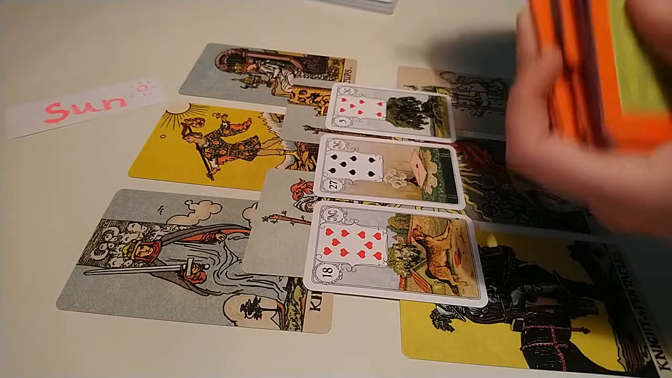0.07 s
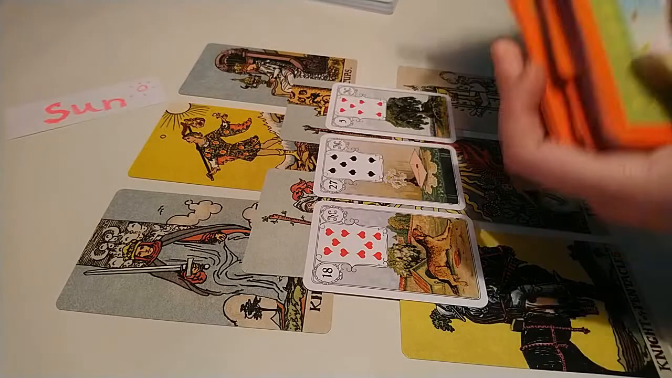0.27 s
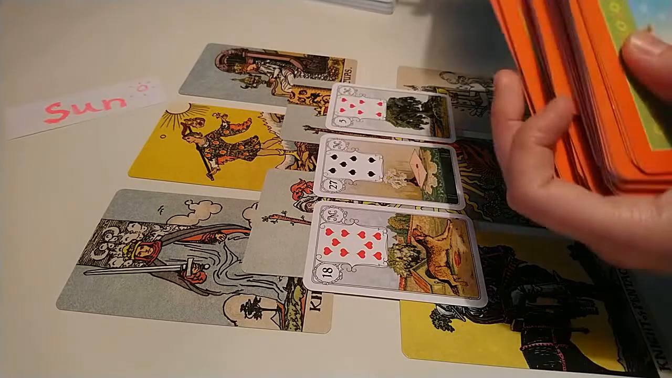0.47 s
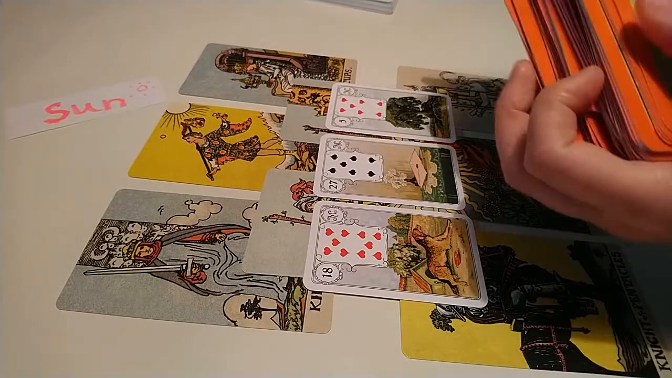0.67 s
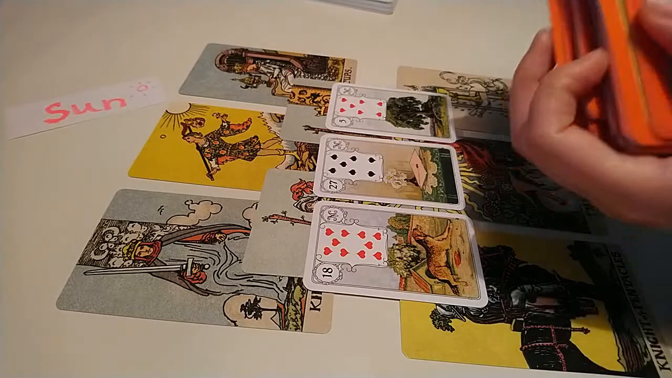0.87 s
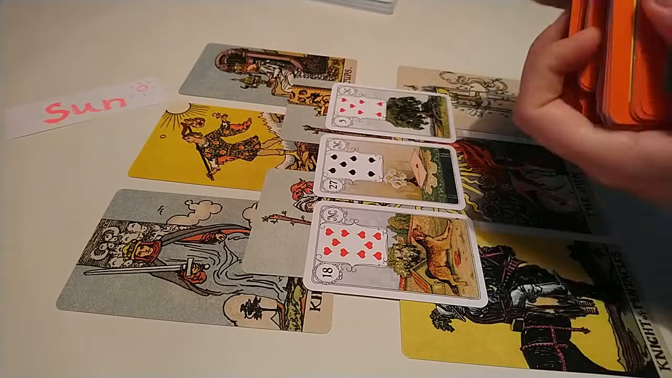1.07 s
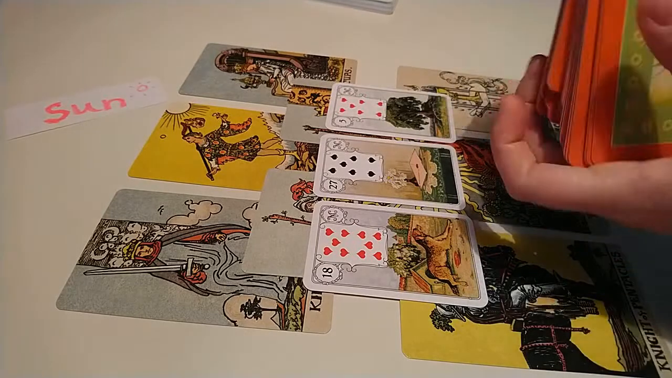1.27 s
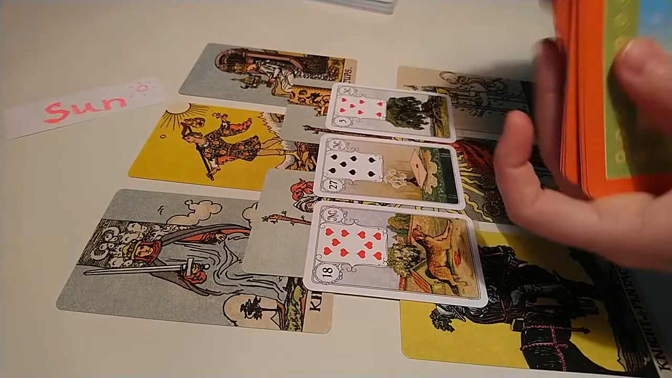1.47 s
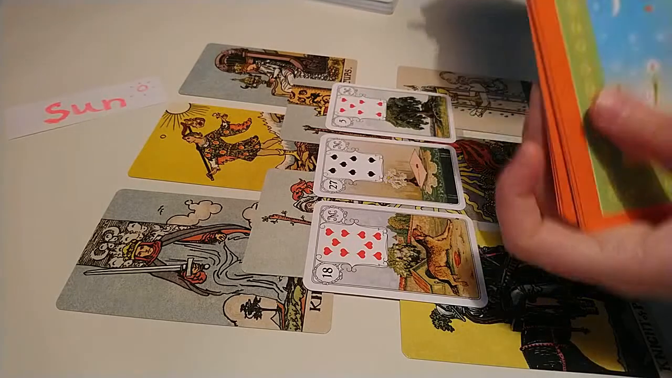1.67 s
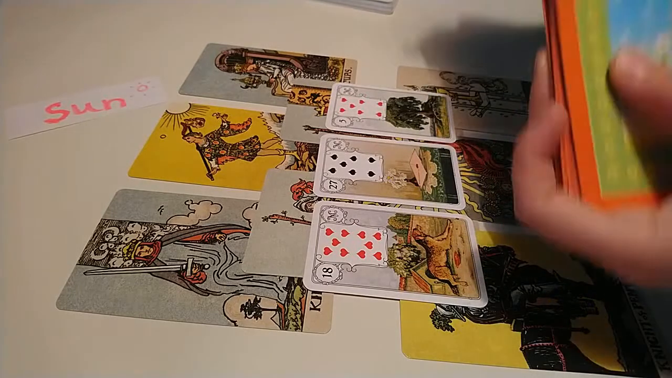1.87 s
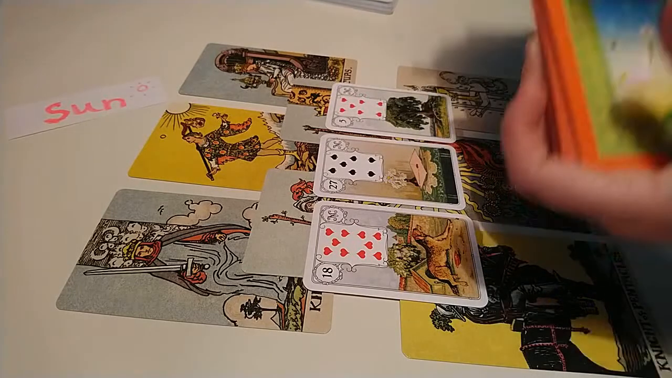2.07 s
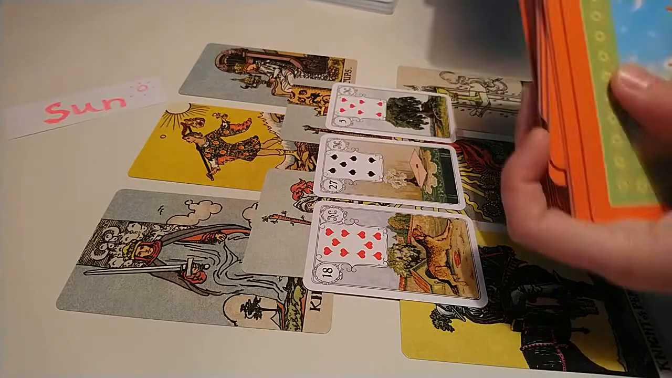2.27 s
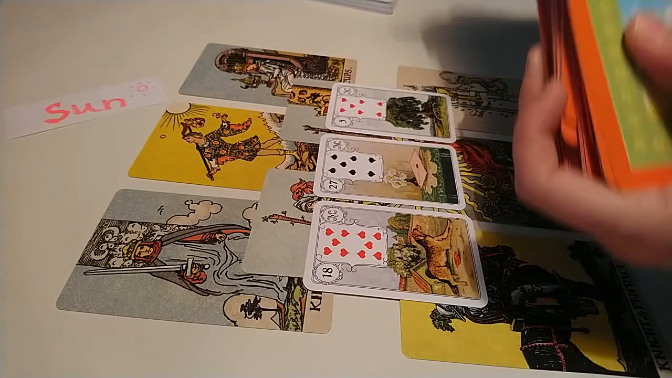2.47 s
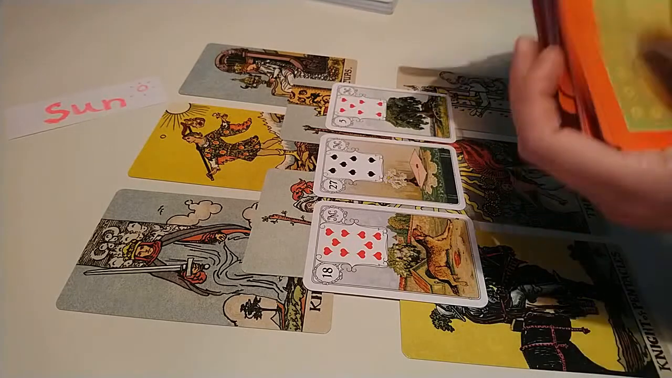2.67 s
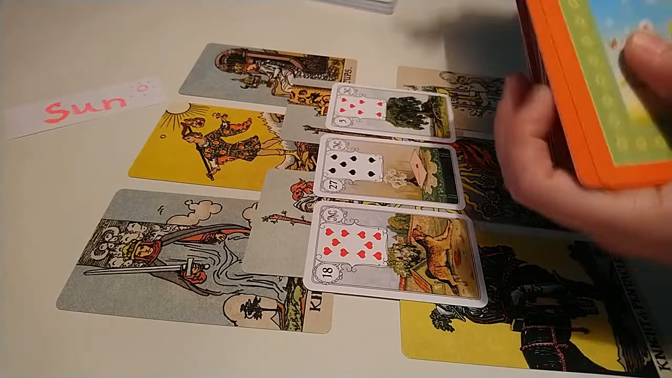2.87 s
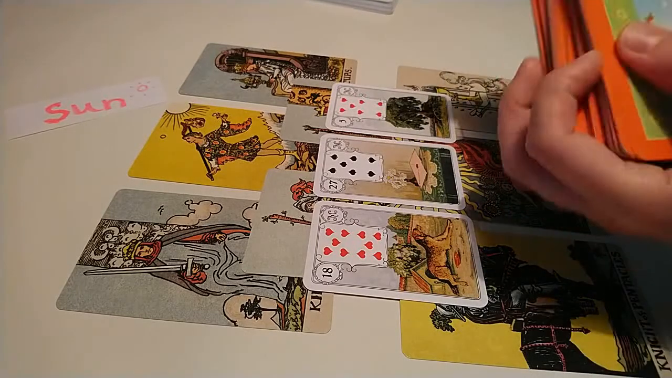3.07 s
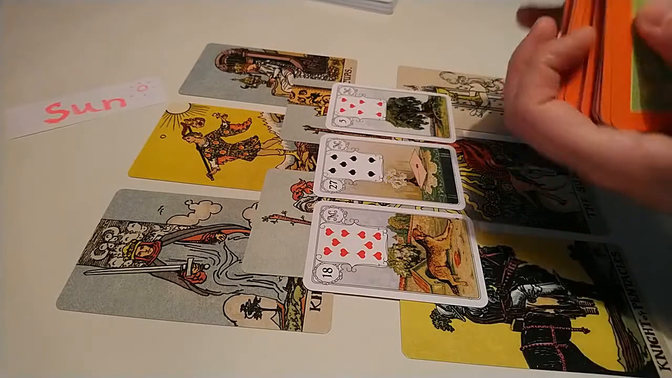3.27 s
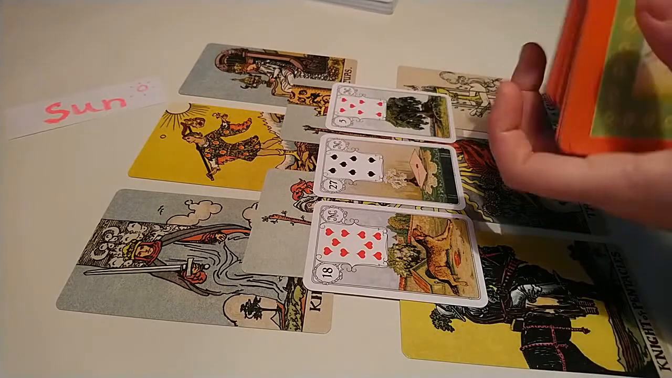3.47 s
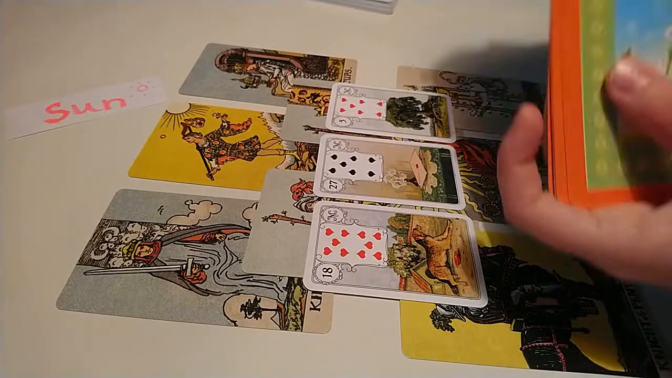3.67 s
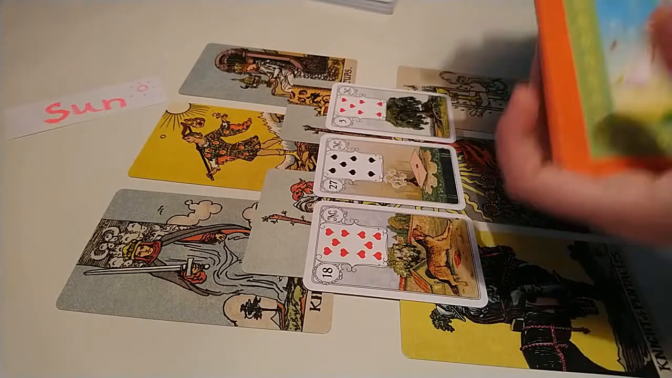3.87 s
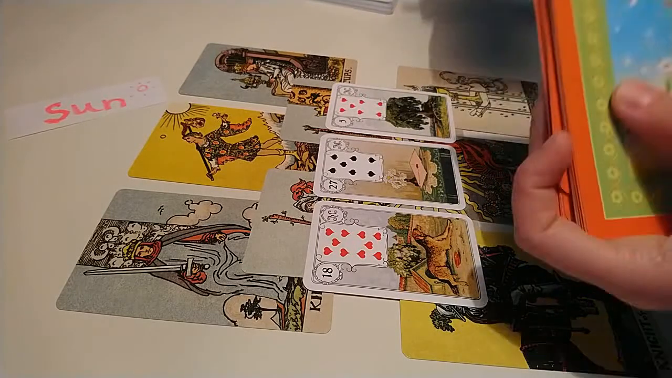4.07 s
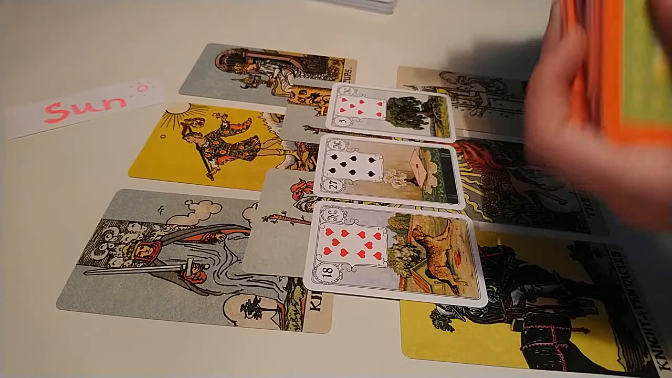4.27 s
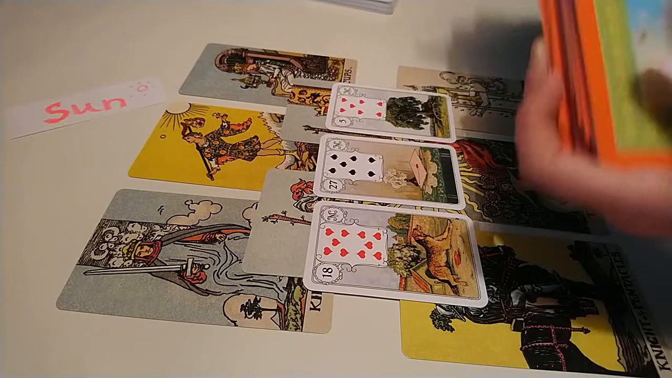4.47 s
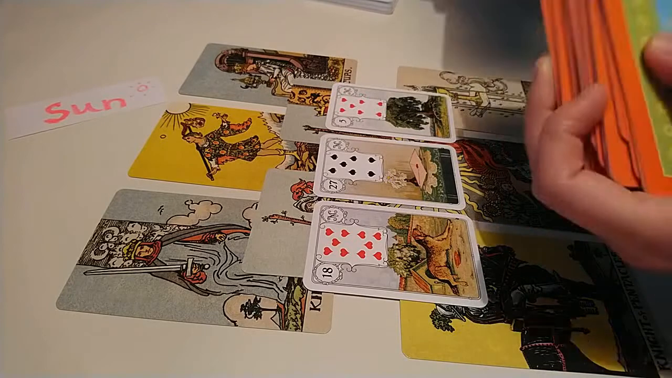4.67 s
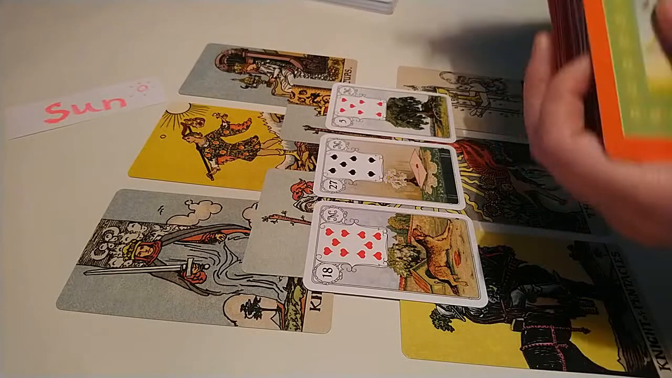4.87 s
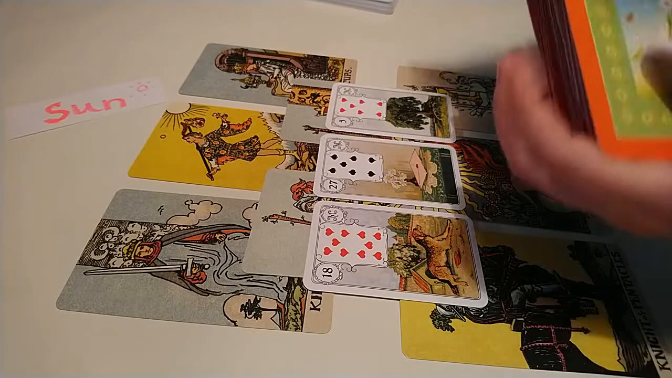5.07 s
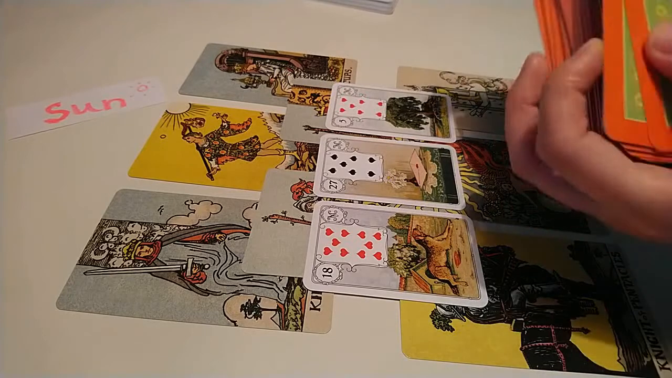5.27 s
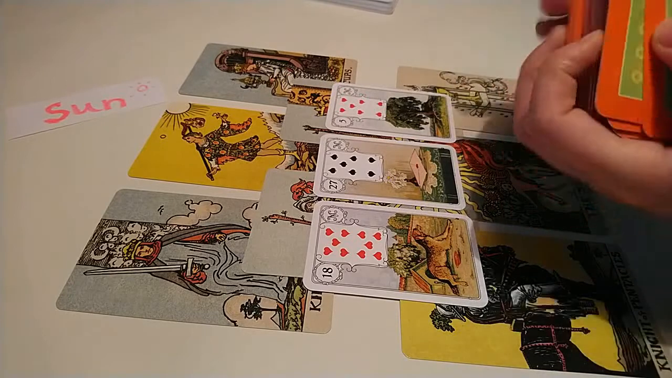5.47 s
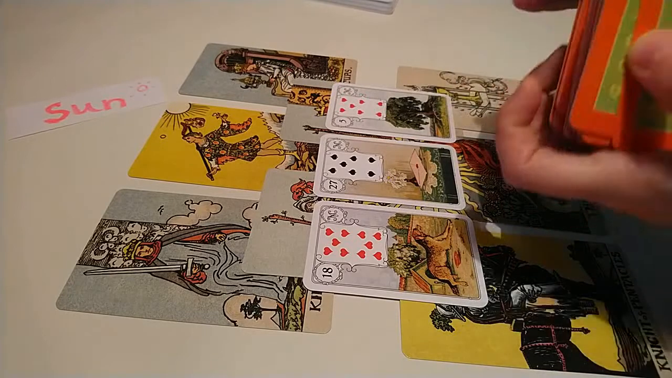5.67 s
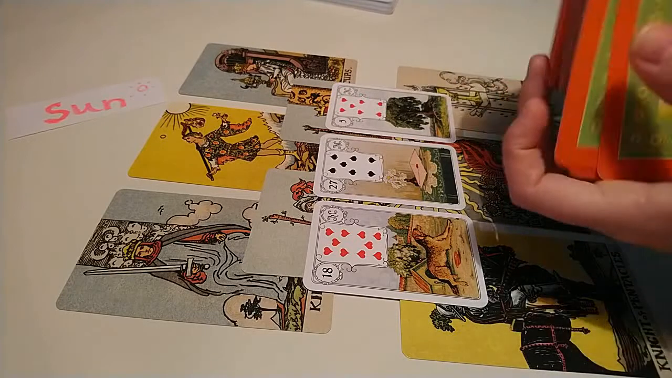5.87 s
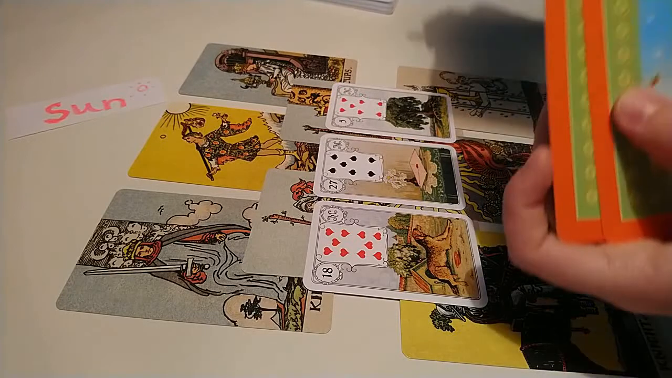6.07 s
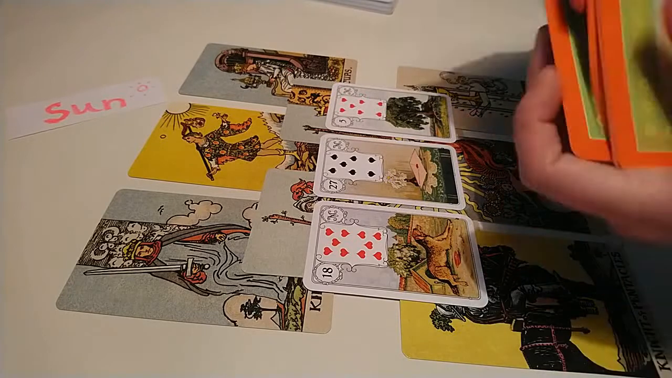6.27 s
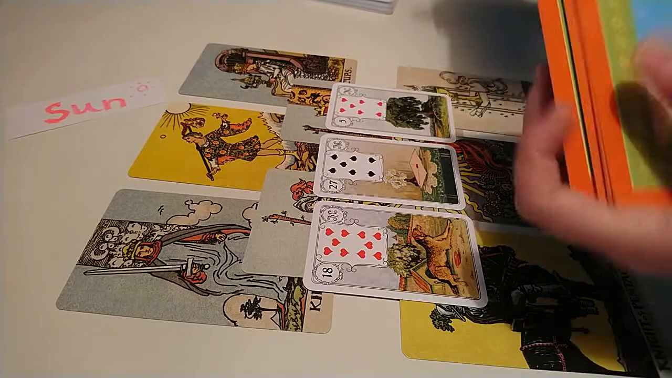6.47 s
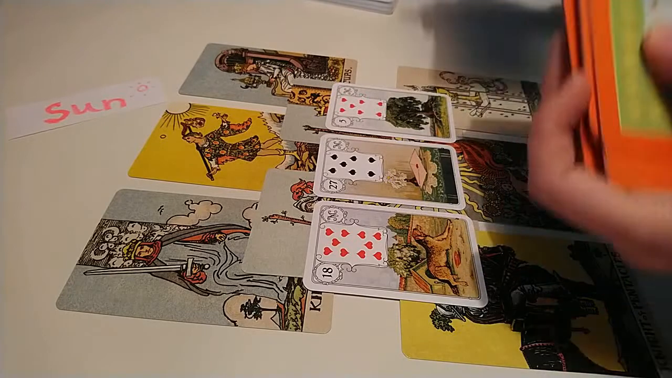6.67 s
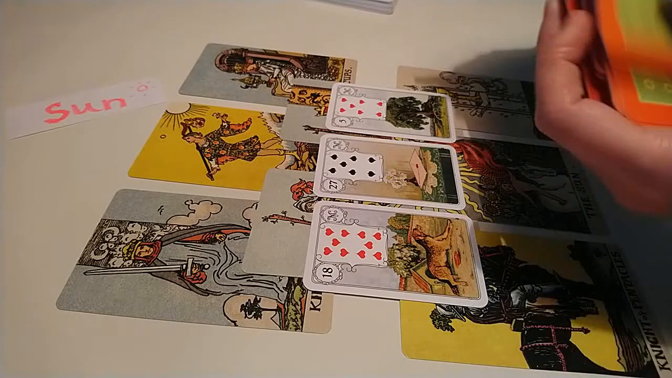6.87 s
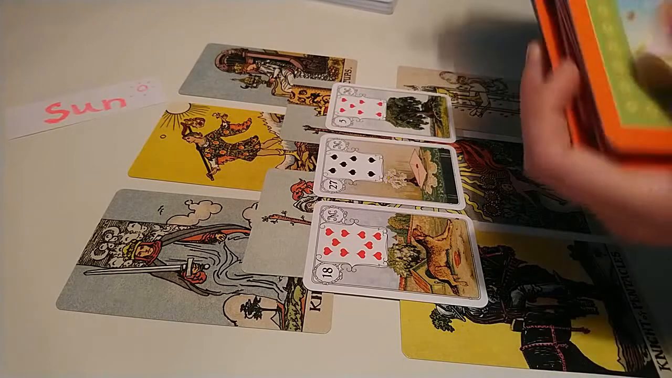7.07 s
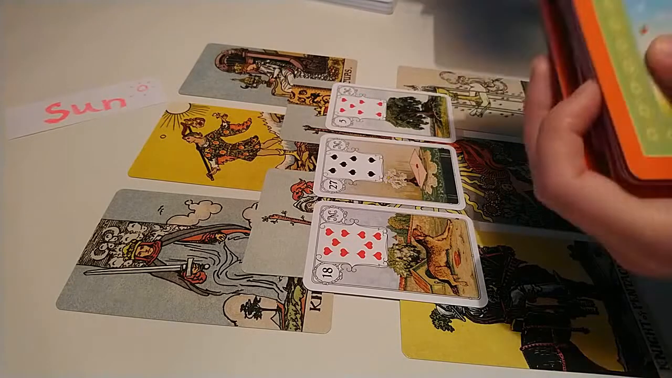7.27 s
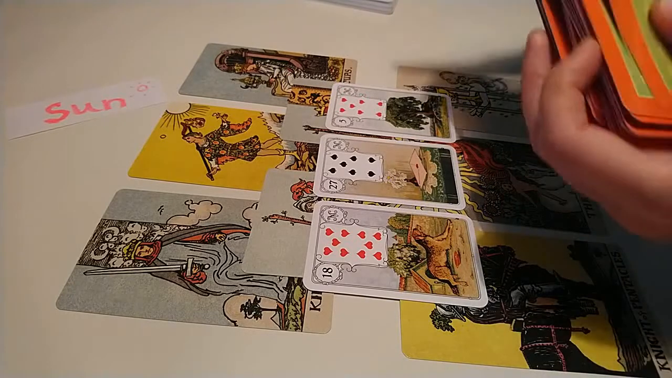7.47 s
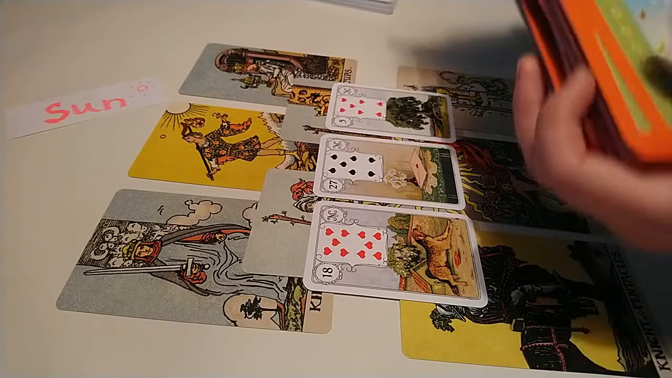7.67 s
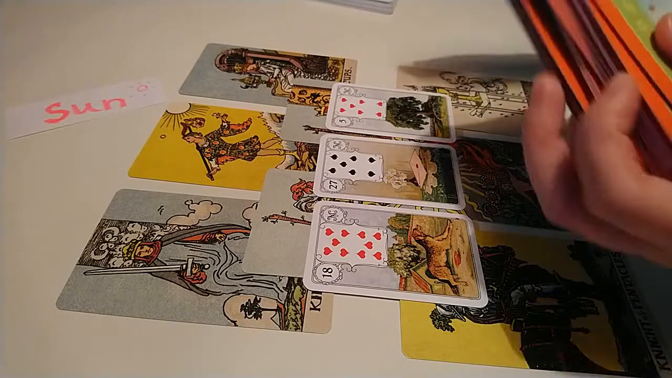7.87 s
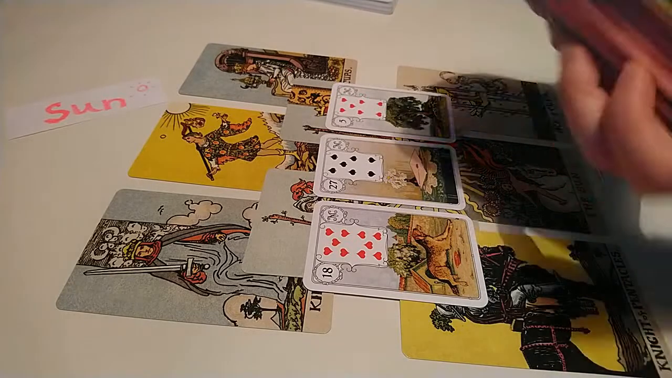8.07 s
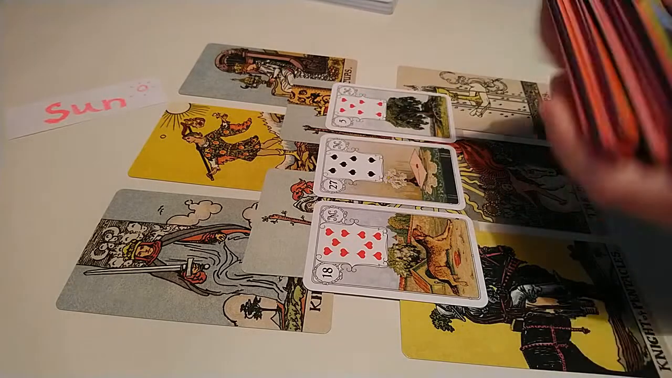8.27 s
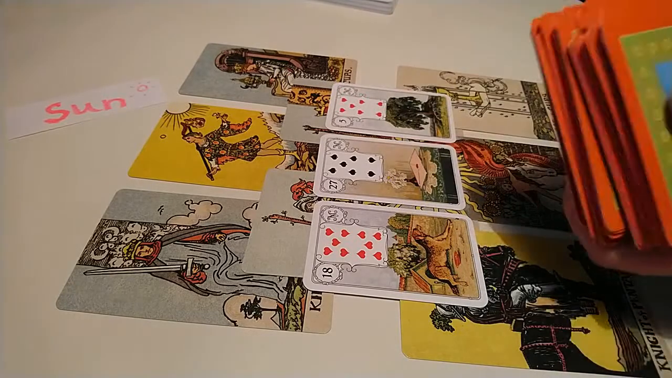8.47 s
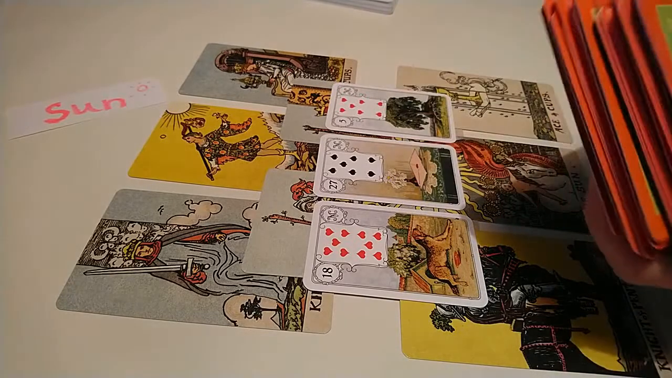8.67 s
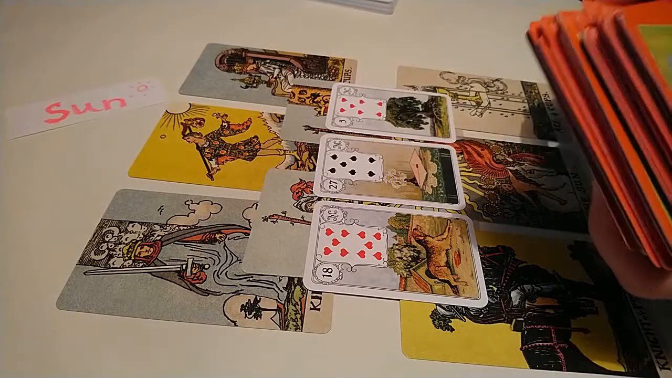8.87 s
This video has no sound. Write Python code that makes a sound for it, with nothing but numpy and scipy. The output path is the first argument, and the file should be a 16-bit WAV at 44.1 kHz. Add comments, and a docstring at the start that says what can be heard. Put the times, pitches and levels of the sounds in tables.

```python
"""Overhand shuffle beside a phone

A thick deck of large cards is shuffled close by in a small room, in four spurts with quiet squaring-up between.
Packets and single cards strike edge-on: noisy pushes ring damped resonances. Sliding faces are filtered friction.
The palm's soft thumps are bass-heavy noise puffs, and one hollow knock is a set of decaying sines.
The phone's two microphone ports colour cards and room echo differently, over quiet air and microphone hiss."""
import sys
import numpy as np
from scipy import signal
from scipy.fft import rfft, irfft
from scipy.io import wavfile

SR = 44100
rng = np.random.default_rng(int(sys.argv[2]) if len(sys.argv) > 2 else 0)


def to_wav(s):
    """Save 16-bit WAV."""
    ch = np.atleast_2d(s).T  # columns
    pcm = np.round(np.clip(ch, -1, 1) * 32767)  # PCM
    wavfile.write(sys.argv[1], SR, pcm.astype(np.int16))


N = 394254

# Room air and microphone hiss, tone only: pitch_hz, left_db, right_db
AIR_TONE = [(20, -27, 1.5), (57, 15, 17), (112, 8, 9.5), (203, 6.5, 4), (493, 2, -6.5), (930, 1.5, 3.5),
            (2820, 0.5, 2), (5500, -3, 4.5), (6800, 0.5, -3.5), (8200, -8, -15), (9050, -2.5, -7.5),
            (11500, -10, -10.5), (13200, -8.5, -11), (17600, -8, 2.5)]
# Background level over the take, sinking at the end: time_s, level_db
AIR_LEVEL = [(0, -58), (4, -58.5), (8.5, -57.5), (8.849, -63)]

# Tone of the card shaken by its rub, relative levels: pitch_hz, level_db
FLUTTER_TONE = [(100, -13.5), (350, -6), (600, -3), (1000, 1), (1650, 2.5), (2400, 4.5), (3200, -5),
                (6000, -37.5)]
# Tone of the hissing card surface, relative levels: pitch_hz, level_db
HISS_TONE = [(1200, -45), (2600, -16), (3600, -0.5), (5200, 9.5), (7000, -5), (10000, -3.5), (16000, -6)]
# Fingers push the cards square: top_speed_s, rise_and_fall_s, flutter_db, hiss_db (before the slide trims)
FINGER_RUBS = [(0.83, 0.015, -64, -53), (0.882, 0.013, -56, -39), (1.025, 0.014, -54, -45.5),
               (1.21, 0.045, -59.5, -47), (1.52, 0.078, -75, -58), (2.437, 0.0083, -44.5, -44),
               (3.309, 0.011, -66, -47.5), (3.375, 0.055, -64.5, -49.5), (3.68, 0.12, -76, -59.5),
               (3.971, 0.015, -49, -38.5), (4.275, 0.0092, -58, -44.5), (4.97, 0.041, -48, -58),
               (5.151, 0.016, -39, -37.5), (5.497, 0.021, -57.5, -49.5), (5.629, 0.041, -68, -52.5),
               (5.855, 0.024, -60.5, -44.5), (6.05, 0.078, -66, -53), (6.32, 0.012, -50, -31.5),
               (6.533, 0.0059, -64, -50.5), (7.57, 0.022, -62, -43.5), (8.108, 0.018, -51, -39.5),
               (8.228, 0.028, -73, -53.5), (8.282, 0.014, -55, -40), (8.355, 0.02, -49, -36),
               (8.803, 0.0095, -66, -54), (8.913, 0.018, -64, -54.5)]
# Overhand strokes; a packet lands, slides home, then the rest of the deck is drawn out again:
# landing_s, thud_db (packet), clack_db (card), snap_db (edge), clack_pitch_hz,
# home_slide_db, wait_until_draw_s, draw_db
OVERHAND_STROKES = [(0.0687, -25, -23, -24.5, 1840, -39, 0.034, -37),
                    (0.335, -37.5, -30.5, -28, 1780, -41, 0.12, -37),
                    (0.6022, -39, -24, -21.5, 1980, -36.5, 0.14, -47),
                    (1.8279, -40, -22, -19, 2010, -32, 0.084, -31),
                    (2.1476, -33, -19, -14, 1840, -30, 0.061, -38),
                    (2.4495, -32, -27, -18.5, 2100, -35.5, 0.05, -46),
                    (2.7153, -27, -22.5, -25.5, 1900, -38, 0.065, -45),
                    (2.9692, -35, -27, -20.5, 1980, -35, 0.13, -48.5),
                    (3.9817, -35.5, -29.5, -31, 1880, -35, 0.08, -35),
                    (4.2820, -29.5, -11, -18, 1976, -38.5, 0.055, -39),
                    (4.5740, -37.5, -21.5, -26, 2030, -37.5, 0.07, -40),
                    (4.853, -34.5, -28.5, -25, 2050, -38.5, 0.09, -45.5),
                    (5.1770, -44, -36, -27, 2160, -44.5, 0.122, -44),
                    (6.3272, -43, -21.5, -29, 1970, -36.5, 0.065, -37.5),
                    (6.6114, -32.5, -32, -30, 1790, -37, 0.074, -35.5),
                    (6.8988, -31.5, -22, -23, 1930, -41.5, 0.071, -38),
                    (7.1742, -24.5, -18.5, -18.5, 2200, -40, 0.092, -43),
                    (7.4386, -47.5, -38, -34.5, 1890, -41.5, 0.082, -39.5),
                    (7.7569, -39.5, -29.5, -26.5, 2080, -34.5, 0.045, -45.5)]
# The slide home reaches top speed this long after landing; flutter is set against hiss
HOME_S, HOME_RISE_S, HOME_FALL_S, HOME_FLUTTER_DB = 0.026, 0.016, 0.021, -6
DRAW_RISE_S, DRAW_FALL_S, DRAW_FLUTTER_DB = 0.023, 0.019, -10

# Heavily damped resonances, before retuning: pitch_hz, width_hz, relative_level_db
PACKET_MODES = [(170, 840, 0.5), (346, 235, 8.5), (770, 234, 0.5), (1016, 164, 2.5)]  # the whole packet
CARD_MODES = [(1218, 320, 0), (1610, 270, 8), (2315, 335, 4.5), (3080, 500, -11.5)]  # one card
EDGE_MODES = [(3630, 1940, 2.5), (5410, 1230, 10.5), (6230, 1420, -4.5), (10100, 9800, -8)]  # a card's edge
# Single cards flicking against the deck: start_s, thud_db, clack_db, snap_db
CARD_FLICKS = [(0.064, -33, -34, -33), (0.167, -67, -47, -45), (0.3397, -41, -32, -33),
               (0.379, -45, -38.5, -37), (0.401, -42.5, -40, -36), (0.8662, -73, -41.5, -49),
               (0.890, -70, -53, -24), (0.9063, -81, -47, -35), (1.008, -78, -53, -42),
               (1.1505, -53.5, -51, -39.5), (1.8733, -37, -23.5, -26.5), (1.888, -30.5, -53, -48),
               (1.932, -34, -30.5, -45), (2.1444, -27.5, -29, -21), (2.1783, -28.5, -23.5, -26),
               (2.2579, -48, -47, -35.5), (2.4598, -55, -31, -27.5), (2.4972, -47, -53, -34),
               (2.5173, -40.5, -42, -43), (2.7212, -34.5, -31, -31), (2.798, -33.5, -33.5, -38),
               (3.0019, -36.5, -37, -30.5), (3.031, -48, -53, -36), (3.0887, -56, -47, -37),
               (3.748, -73, -46.5, -53.5), (3.963, -38, -40, -32), (4.0593, -31, -23.5, -25),
               (4.622, -44, -47, -33), (4.6541, -42.5, -43, -33), (4.6775, -50, -41, -35.5),
               (4.9692, -45.5, -37.5, -41.5), (5.1894, -63, -45, -32), (5.203, -62, -43, -36),
               (5.2945, -69, -41, -31.5), (6.1072, -47.5, -49, -38), (6.299, -41, -34.5, -29.5),
               (6.3153, -37, -28, -34), (6.4005, -35.5, -34.5, -28.5), (6.64, -60, -38, -33),
               (6.6916, -40, -27.5, -32.5), (6.972, -40.5, -27.5, -43), (7.012, -35.5, -39, -31),
               (7.177, -32, -19, -19.5), (7.4431, -41.5, -37.5, -30), (7.4872, -40.5, -40.5, -57),
               (8.0056, -63, -51, -37.5), (8.0595, -59, -43.5, -47), (8.325, -80, -49, -28.5),
               (8.341, -75, -31, -30.5), (8.718, -80, -61, -51.5), (8.8792, -80, -49.5, -54)]
CARD_HZ = 1889  # clack pitch of a card held at its usual length
FLICK_HZ, EDGE_ON_HZ_PER_DB = 1806, 14  # more snap than clack: more edge-on and higher
# Loose cards tick at random while sliding; levels against the hiss of the slide
TICK_THUD_DB, TICK_CLACK_DB, TICK_SNAP_DB, TICK_SCATTER_DB = -24, -10.5, -4, 1

# Tone of a palm thump, relative levels: pitch_hz, level_db
PALM_TONE = [(20, -21), (40, -6.5), (62, 1), (110, -0.5), (200, -7.5), (400, -22), (1500, -58.5)]
# The hand shifts its grip on the deck with a soft bump: start_s, level_db
GRIP_SHIFTS = [(0.395, -44.5), (1.555, -57), (3.098, -45), (3.719, -52), (3.965, -41), (5.304, -55),
               (6.34, -36.5)]
# The palm takes the packet, gives way and catches it again, and is nudged by the draw
PALM_LEAD_S, PALM_DB, USUAL_THUD_DB = 0.004, -42.5, -29
PALM_FOLLOW = 0.16  # dB of thump for each dB of thud above the usual
REBOUND_S, REBOUND_DB = 0.036, -4  # after the landing; against its thump
DRAW_THUMP_DB = -10  # against the hiss of the draw

# The deck bumps once with a hollow knock: start_s, level_db
HOLLOW_KNOCK = (2.798, -33.5)
# Its resonances, levels relative to the knock: pitch_hz, level_db, t60_s
HOLLOW_MODES = [(435, -5, .05), (680, 2, 0.07), (720, -10, .13), (1140, 4, 0.039), (1450, -2, 0.022)]

# The phone body shades the left port from the hands: pitch_hz, level_db
BODY_SHADE = [(100, -3.5), (500, 0.5), (950, 2), (1300, -2.5), (1650, -2.5), (2300, -0.5), (16000, 1)]
# Reverberation time of the small room: pitch_hz, t60_s
ROOM_DECAY = [(100, 0.34), (300, 0.61), (800, 0.54), (2000, 0.38), (5000, 0.38), (14000, 0.34)]
# Response of the two microphone ports: pitch_hz, left_db, right_db
PORT_RESPONSE = [(79.5, -11, -1), (217, -8, -0.5), (432, -1, 1), (1610, -8, 1), (2410, -5.5, 0),
                 (3105, 2, 7), (4340, -14, 3), (5550, -12, 3), (7016, 8, 3), (8360, -7, -48),
                 (8530, 2.5, -4.5), (11670, -8.5, -23), (13000, -7, -3), (16000, -5, -9.5)]
TOP_HZ = 15950


def undb(db):
    """Decibels to gain."""
    return 10 ** (np.asarray(db) / 20)


def unit(x):
    """Scale to rms 1."""
    return x / np.sqrt(np.mean(x ** 2))


def add(track, s, sound):
    """Mix a sound into a track from time s on."""
    i = max(int(s * SR), 0)
    track[i:i + len(sound)] += sound[:max(len(track) - i, 0)]


def colour(x, hz, db):
    """Minimum-phase filter through (Hz, dB) points, so no sound precedes its cause."""
    size = 4096
    f = np.maximum(np.fft.rfftfreq(size, 1 / SR), 1)
    log_gain = np.log(undb(np.interp(np.log(f), np.log(hz), db)))
    # folding the cepstrum forward in time makes the filter causal
    cepstrum = irfft(log_gain)
    cepstrum[1:size // 2] *= 2
    cepstrum[size // 2 + 1:] = 0
    response = irfft(np.exp(rfft(cepstrum)))
    return signal.fftconvolve(x, response)[:len(x)]


def sway(per_s):
    """Random motion between about -1 and 1, with a new target per_s times a second."""
    t = np.arange(N) / SR * per_s
    count = int(t[-1]) + 2
    return np.interp(t, np.arange(count), rng.uniform(-1.03, 1, count))


def air(shared_hz=500):
    """Quiet background noise; its bass reaches both ports alike, its treble differs."""
    hz, *sides = np.transpose(AIR_TONE)
    common = rng.standard_normal(N)
    own_db = 10 * np.log10(hz / (hz + shared_hz))
    shared_db = 10 * np.log10(shared_hz / (hz + shared_hz))
    ports = []
    for db in sides:
        shared = colour(common, hz, db + shared_db)
        own = colour(rng.standard_normal(N), hz, db + own_db)
        ports.append(shared + own)
    level_db = np.interp(np.arange(N) / SR, *np.transpose(AIR_LEVEL))
    return unit(np.array(ports)) * undb(level_db)


def friction(catches_per_s, spread_db, smooth, jerk_db=4.5, edges_per_s=110, edge_s=0.00096, edge_gain=1.87):
    """Tiny catches over the smooth rub of paper, in jerks, with a tick as each card edge slips past; rms 1."""
    sizes = undb(spread_db * np.minimum(rng.exponential(size=N), 3.5))
    catches = (rng.random(N) < catches_per_s / SR) * sizes * rng.choice([-1, 1], N)
    edge_hits = (rng.random(N) < edges_per_s / SR) * rng.uniform(0.28, 1, N)
    edges = signal.lfilter([1], [1, -np.exp(-1 / (edge_s * SR))], edge_hits)
    pressure = (1 + edge_gain * edges) * undb(jerk_db * sway(per_s=220))
    return unit((unit(catches) + smooth * rng.standard_normal(N)) * pressure)


def slide_plan():
    """Finger rubs and two slides a stroke: rows (top_speed_s, rise_s, fall_s, flutter_db, hiss_db)."""
    rows = [(s, length, length, flutter, hiss) for s, length, flutter, hiss in FINGER_RUBS]
    for s, *_, home, wait, draw in OVERHAND_STROKES:
        rows.append((s + HOME_S, HOME_RISE_S, HOME_FALL_S, home + HOME_FLUTTER_DB, home))
        rows.append((s + wait, DRAW_RISE_S, DRAW_FALL_S, draw + DRAW_FLUTTER_DB, draw))
    return rows


def slides(start_curve=1.15, flutter_db=0.9, hiss_db=0.44):
    """Each slide speeds up and is braked; the same catches shake the card and make its surface hiss."""
    t = np.arange(N) / SR
    flutter_power, hiss_power = np.zeros(N), np.zeros(N)
    for s, rise, fall, body_db, surface_db in slide_plan():
        near = slice(max(int((s - .5) * SR), 0), int((s + .5) * SR))
        d = t[near] - s
        away = np.abs(d)
        speed = np.exp(-np.where(d < 0, (away / rise) ** start_curve, away / fall))
        flutter_power[near] += (speed * undb(body_db + flutter_db)) ** 2
        hiss_power[near] += (speed * undb(surface_db + hiss_db)) ** 2
    rub = friction(catches_per_s=2500, spread_db=1.0, smooth=1.17)
    flutter = np.sqrt(flutter_power) * unit(colour(rub, *np.transpose(FLUTTER_TONE)))
    hiss = np.sqrt(hiss_power) * unit(colour(rub, *np.transpose(HISS_TONE)))
    return flutter + hiss


def ring(push, modes, stretch):
    """Damped resonances driven by one push, all tuned by the same stretch."""
    out = 0
    for k, (hz, width, db) in enumerate(modes):
        b, a = signal.iirpeak(min(hz * stretch, SR / 2 - 2000), hz / width, fs=SR)
        polarity = (-1) ** k
        out = out + polarity * undb(db) * signal.lfilter(b, a, push)
    return out


def highpass(x, hz):
    """A small radiator sends out little below its lowest resonance."""
    return signal.sosfilt(signal.butter(2, hz, "high", fs=SR, output="sos"), x)


def strike_plan(count=2):
    """Landings, flicks and chance ticks in every slide: rows (s, thud_db, clack_db, snap_db, pitch_hz)."""
    flicks = list(CARD_FLICKS)
    for s, rise, fall, _, hiss in slide_plan():
        for when, size in rng.uniform(-1, 1, (count, 2)):
            tick_s = s + when * (fall if when > 0 else rise)
            db = hiss + size * TICK_SCATTER_DB
            flicks.append((tick_s, db + TICK_THUD_DB, db + TICK_CLACK_DB, db + TICK_SNAP_DB))
    rows = [stroke[:5] for stroke in OVERHAND_STROKES]
    for s, thud, clack, snap in flicks:
        rows.append((s, thud, clack, snap, FLICK_HZ + EDGE_ON_HZ_PER_DB * (snap - clack)))
    return rows


def strikes(plan, chatter, settle, graze=0.15, graze_s=0.0014, chatter_s=0.0014, settle_s=0.01,
            detune=0.014, thud_db=0, clack_db=0, snap_db=0):
    """An edge grazes the deck and lands; the packet's other cards follow in a millisecond or two and settle."""
    out = np.zeros(N)
    lead = SR // 150  # samples of grazing before the landing
    blow = SR * .004  # levels are rms over a 4 ms blow
    t = np.arange(-lead, SR // 30) / SR
    before = 2 * graze * np.exp(-np.abs(t) / graze_s)
    after = np.exp(-np.abs(t) / chatter_s) + settle * np.exp(-np.abs(t) / settle_s)
    contact = chatter * np.where(t < 0, before, after)
    for s, thud, clack, snap, hz in plan:
        push = rng.standard_normal(len(t)) * contact
        push[lead] += 2  # the landing itself
        grip = hz / CARD_HZ  # a card held shorter rings higher
        packet_stretch, edge_stretch = np.exp(detune * rng.standard_normal(2))
        parts = (
            (ring(push, PACKET_MODES, packet_stretch), thud + thud_db),
            (highpass(ring(push, CARD_MODES, grip), 700 * grip), clack + clack_db),
            (highpass(ring(push, EDGE_MODES, edge_stretch), 1760), snap + snap_db),
        )
        for part, db in parts:
            add(out, s - lead / SR, part * undb(db) * np.sqrt(blow / np.sum(part ** 2)))
    return out


def thump_plan():
    """Louder thuds thump harder on landing and rebound, brisker draws nudge more: rows (start_s, level_db)."""
    rows = list(GRIP_SHIFTS)
    for s, thud, *_, wait, draw in OVERHAND_STROKES:
        db = PALM_DB + PALM_FOLLOW * (thud - USUAL_THUD_DB)
        rows.append((s - PALM_LEAD_S, db))
        rows.append((s + REBOUND_S, db + REBOUND_DB))
        rows.append((s + wait, draw + DRAW_THUMP_DB))
    return rows


def thumps(decay_s=0.018, level_db=0):
    """The soft palm stops the packet and pushes out a puff of air: decaying, bass-heavy noise."""
    out, t = np.zeros(N), np.arange(SR // 8) / SR
    length = SR * .02  # levels are rms over 20 ms
    for s, db in thump_plan():
        burst = rng.standard_normal(len(t)) * np.exp(-t / decay_s)
        puff = colour(burst, *np.transpose(PALM_TONE))
        add(out, s, puff * undb(db + level_db) * np.sqrt(length / np.sum(puff ** 2)))
    return out


def knock():
    """A few hollow modes, struck once, each dying away at its own rate."""
    out, t = np.zeros(N), np.arange(SR // 4) / SR
    s, level_db = HOLLOW_KNOCK
    for hz, db, t60 in HOLLOW_MODES:
        decay = np.exp(-np.log(1000) * t / t60)
        add(out, s, undb(level_db + db) * np.sin(2 * np.pi * hz * t) * decay)
    return out


def far_port(cards, lag_s=0.00012, sway_s=0.00012, sway_db=1.5, bounce=0.68, bounce_s=0.000917):
    """The left port faces away from the moving hands: it hears them later, and again off the table."""
    n, place = np.arange(N), sway(per_s=7.8)
    direct = np.interp(n - SR * (lag_s + sway_s * place), n, cards)
    off_table = np.interp(n - SR * bounce_s * (1 + .5 * sway(per_s=9.7)), n, cards)
    return (direct + bounce * off_table) * undb(sway_db * place)


def room(x, wet_db, gap_s=0.0035, build_s=0.00043):
    """Diffuse echoes start after a short gap, and each band dies at its own rate."""
    t = np.arange(SR // 2) / SR
    spectrum, f = rfft(rng.standard_normal(len(t))), np.fft.rfftfreq(len(t), 1 / SR)
    hz, t60 = np.transpose(ROOM_DECAY)
    tail = 0
    for share, seconds in zip(np.eye(len(hz)), t60):  # overlapping bands, one per decay point
        band = irfft(spectrum * np.interp(np.log(f + 1), np.log(hz), share), len(t))
        tail = tail + band * np.exp(-np.log(1000) * t / seconds)
    tail = tail * (1 - np.exp(-np.maximum(t - gap_s, 0) / build_s))
    return undb(wet_db) * signal.fftconvolve(x, tail / np.sqrt(np.sum(tail ** 2)))[:N]


def scene():
    """Cards and palm, heard directly and through the room by two ports, over the air."""
    handling = slides() + thumps() + knock()
    plan = strike_plan()
    near = handling + strikes(plan, chatter=0.46, settle=0.12)
    # the walls gather each slap from all directions, which evens out the comb of its chatter
    around = handling + undb(-1.63) * strikes(plan, chatter=0.11, settle=0.072)
    left = colour(far_port(near), *np.transpose(BODY_SHADE)) + room(around, wet_db=-5.5)
    right = near + room(around, wet_db=-10.0)
    hz, left_db, right_db = np.transpose(PORT_RESPONSE)
    return np.array([colour(left, hz, left_db), colour(right, hz, right_db)]) + air()


def record(dry):
    """The phone rounds the sharpest peaks and cuts the top."""
    ceiling = .95
    rounded = ceiling * np.tanh(dry / ceiling)
    top_cut = signal.ellip(10, .2, 70, TOP_HZ, fs=SR, output="sos")
    return signal.sosfilt(top_cut, rounded)


dry = scene()
out = record(dry)
to_wav(out)
```